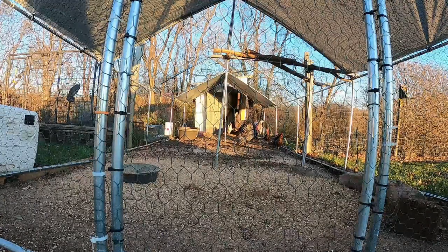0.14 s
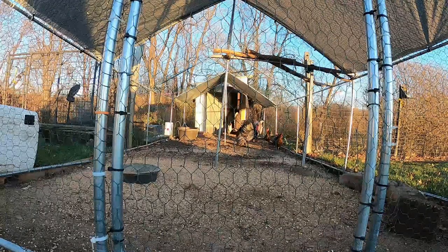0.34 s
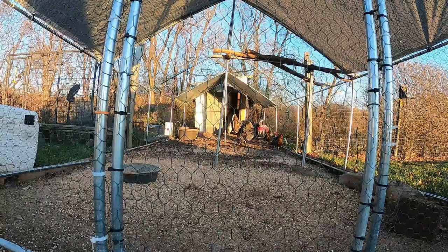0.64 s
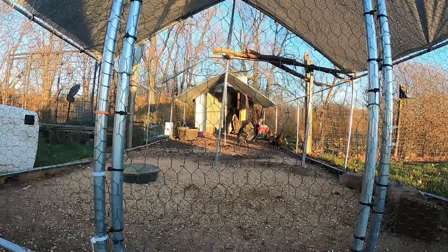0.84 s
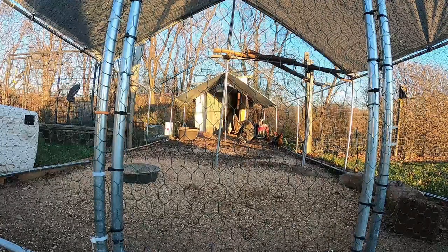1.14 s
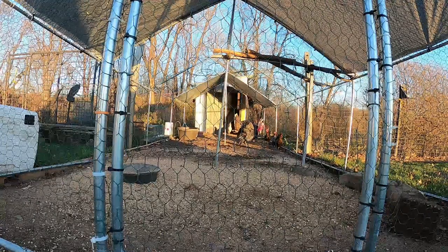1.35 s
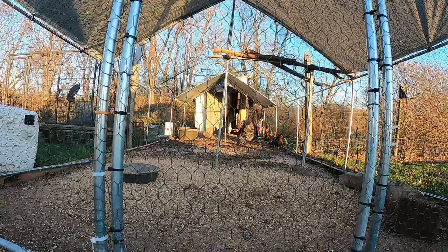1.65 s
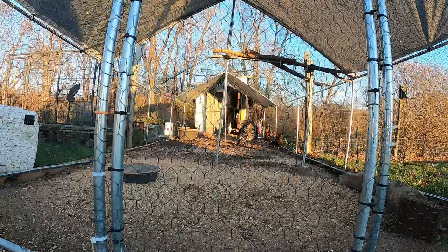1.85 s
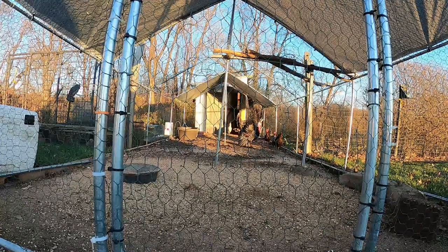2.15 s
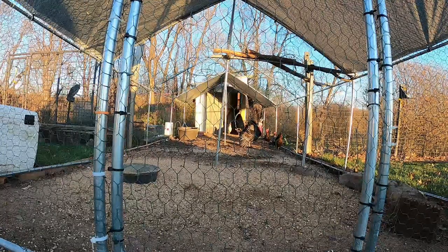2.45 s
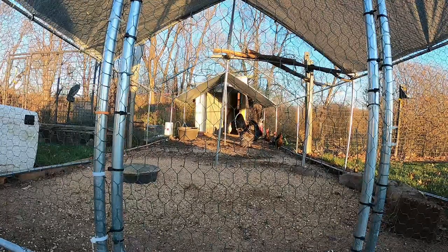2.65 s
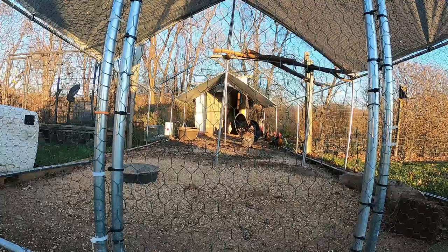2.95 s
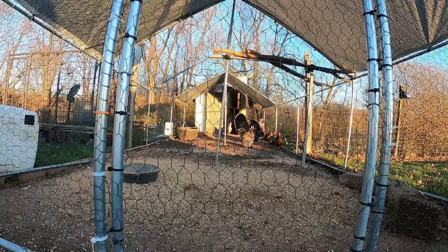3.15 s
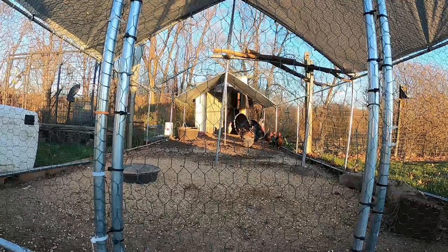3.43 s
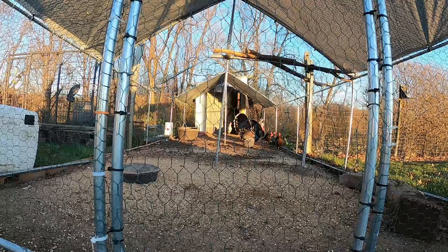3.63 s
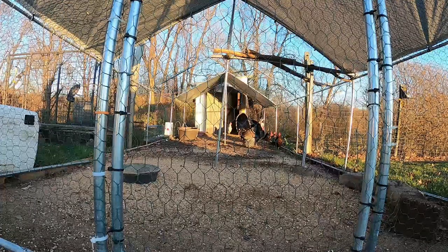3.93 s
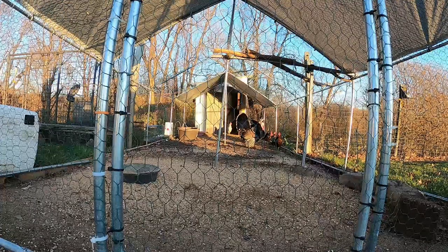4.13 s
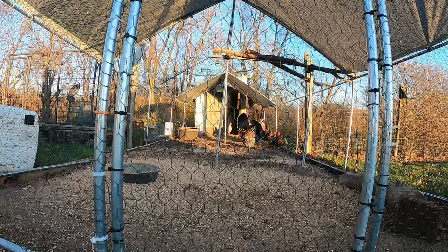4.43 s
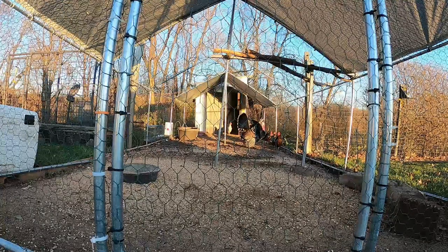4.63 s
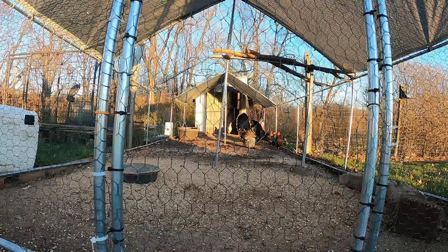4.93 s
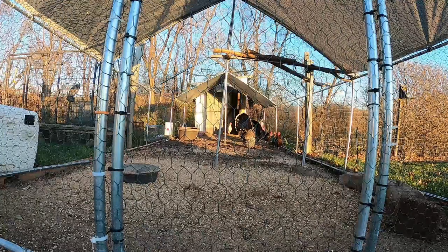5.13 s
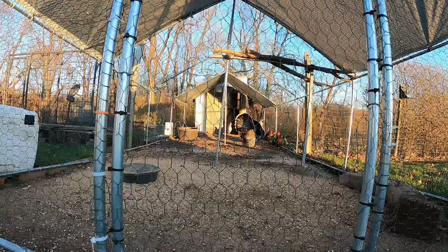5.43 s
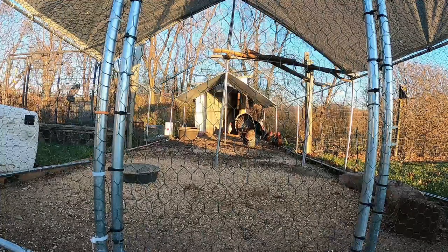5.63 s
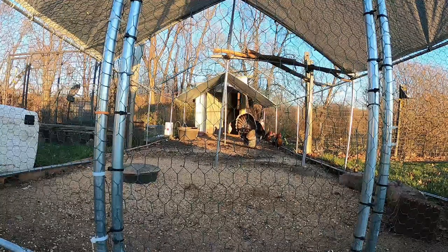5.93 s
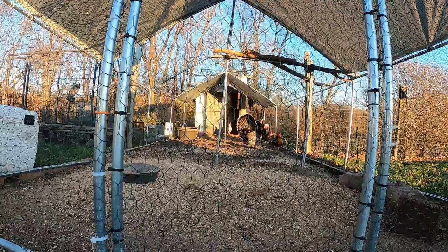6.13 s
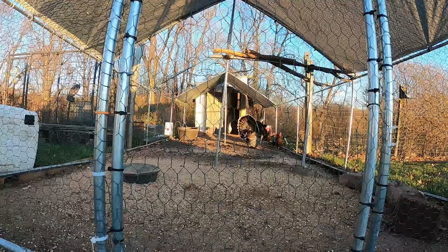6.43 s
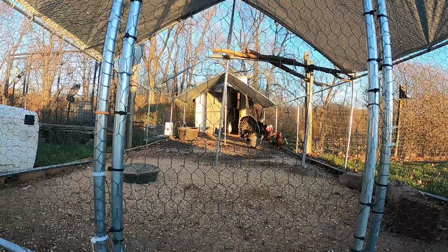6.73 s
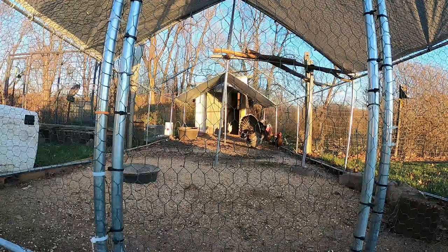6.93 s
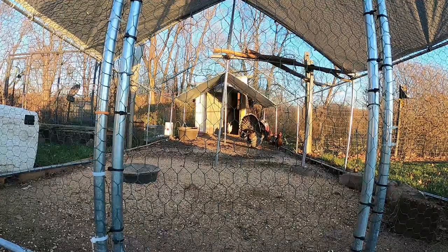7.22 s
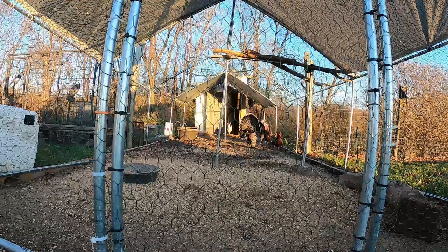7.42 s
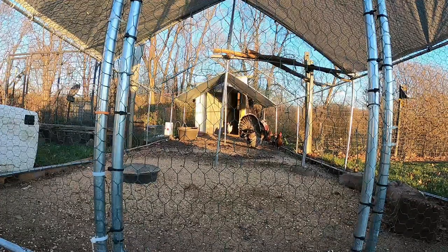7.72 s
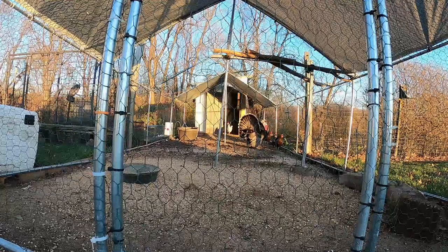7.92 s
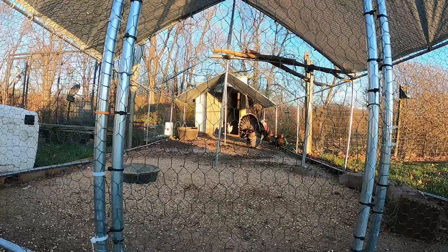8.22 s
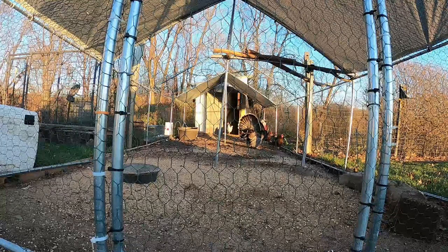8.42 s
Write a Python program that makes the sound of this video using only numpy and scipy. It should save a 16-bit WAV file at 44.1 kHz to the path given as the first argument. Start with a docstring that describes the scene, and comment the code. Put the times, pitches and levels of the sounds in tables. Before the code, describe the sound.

A tom turkey close by gobbles loudly twice in an outdoor run while distant turkeys answer with blurred gobbles and yelps over quiet low rumble.

```python
"""Outdoor turkey run: a tom close by gobbles twice, and others gobble and yelp by the far shed.
Near gobbles open with shrieks, then follow one pattern of hoots near 600 Hz and yodels breaking down
from a squeal. Each voice is a buzzing, fluttering membrane coloured by throat resonance and rasp.
Whistled peeps, a chip and a soft noise rustle sound over a rumble, drone and hum of filtered noise."""
import sys
import numpy as np
from scipy import signal
from scipy.fft import rfft, irfft, next_fast_len
from scipy.io import wavfile
from scipy.ndimage import uniform_filter1d, minimum_filter1d, map_coordinates

SR = 44100
rng = np.random.default_rng(int(sys.argv[2]) if len(sys.argv) > 2 else 0)


def file_out(sig):
    """Save sig as 16-bit WAV at sys.argv[1]."""
    # one column per channel
    cols = np.atleast_2d(sig).T
    # limit, then scale
    lim = np.clip(cols, -1, 1)
    pcm = np.round(lim * 32767).astype(np.int16)
    wavfile.write(sys.argv[1], SR, pcm)


N = 377937
CUTOFF_HZ = 14200  # upper band limit of voices and output


def amp(db):
    """Converts dB to an amplitude factor."""
    return 10 ** (np.asarray(db) / 20)


def evened(x):
    """Scales to rms 1."""
    return x / np.sqrt(np.mean(x ** 2) + 1e-20)


def read(points, hz):
    """Interpolates (Hz, value) points on a log-frequency axis."""
    point_hz, value = np.transpose(points)
    return np.interp(np.log(hz + 1), np.log(point_hz), value)


def level_curve(points):
    """Interpolates (s, dB) points over the scene, as an amplitude factor."""
    t = np.arange(N) / SR
    return amp(np.interp(t, *np.transpose(points)))


def add(mix, start_s, sound):
    """Mixes a sound in at start_s, trimming whatever falls outside the mix."""
    start = round(start_s * SR)
    sound = sound[max(-start, 0):]
    part = mix[max(start, 0):][:len(sound)]
    part += sound[:len(part)]


def colour(x, points, peak_hz=0, width_hz=0):
    """Filters by a (Hz, dB) spectrum and, if given, one resonance; rms 1."""
    size = next_fast_len(2 * len(x))
    hz = np.fft.rfftfreq(size, 1 / SR)
    gain = amp(read(points, hz))
    if width_hz:
        gain = gain / (1 + 2j * (hz - peak_hz) / width_hz)
    filtered = irfft(rfft(x, size) * gain, size)
    return evened(filtered[:len(x)])


def wander(count, rate_hz):
    """Smooth random motion of rms about 1."""
    at = np.arange(count) * abs(rate_hz) / SR
    return map_coordinates(rng.standard_normal(size=1024), [at], order=3, mode="wrap")


def swell(u, edge):
    """Rises and falls over the share edge of a note; u runs from 0 to 1."""
    return np.sin(np.pi / 2 * np.clip(np.minimum(u, 1 - u) / edge, 0, 1))


def reverb(x, decay, delay_s):
    """Sparse reflections of random sign, each band dying at its own speed; energy 1."""
    taps = rng.choice([-1., 1.], SR) * (rng.random(SR) < 1 / 20)
    hz, t, spectrum = signal.stft(taps, SR)
    t60_s = read(decay, hz)[:, None]
    tail = signal.istft(spectrum * np.exp(-np.log(1000) * t / t60_s), SR)[1]
    tail = np.r_[np.zeros(round(abs(delay_s) * SR)), tail]
    return signal.oaconvolve(x, tail / np.linalg.norm(tail))[:N]


# outdoor rumble spectrum: (freq_hz, density_db_per_hz), relative
AIR = [(15, -51.5), (25, -25.5), (129, -4.5), (372, -14.5), (569, -15), (940, -16.5), (1130, -16.5),
       (2640, -28), (4140, -35), (7420, -46.5), (8240, -53.5), (14000, -55.5)]
# gain of the whole background: (time_s, gain_db)
AIR_LEVEL = [(0, -46), (.44, -47.5), (.55, -48), (1.4, -53), (2.0, -50.5), (3.7, -48.5), (4.6, -49.5),
             (6.05, -48.5), (6.2, -47), (7.3, -52), (8.57, -50)]
# gain of the drone within the background: (time_s, gain_db)
DRONE_LEVEL = [(0, -16), (1.5, -10.5), (2.2, 0), (3.0, -3), (4.4, -8.5), (5.5, -5.5), (7.0, -10.5),
               (8.57, -10)]
HUM_HZ, HUM_DB = 591, -11.5  # HUM_DB within the background


def outdoors():
    """Broad noise with a drifting level, plus two noise resonances: a hoarse drone and a faint hum."""
    air = colour(rng.standard_normal(N), AIR) * amp(.9 * wander(N, rate_hz=7))
    drone_shape = [(60, -25.0), (125, -6.5), (300, -7.5)]
    drone = colour(rng.standard_normal(N), drone_shape, peak_hz=122.4, width_hz=15)
    hum_shape = [(350, -14.5), (585, -1), (900, -17.5)]
    hum = colour(rng.standard_normal(N), hum_shape, HUM_HZ, width_hz=26)
    background = amp(-0.9) * air + level_curve(DRONE_LEVEL) * drone + amp(HUM_DB) * hum
    return level_curve(AIR_LEVEL) * background


BREATH_FLOOR = 0.06  # share of air noise even in a clean note


def syrinx(pitch_hz, rough, jitter, breath, even_db=0):
    """Vibrating membrane: phase, harmonic buzz with an air puff each cycle, and uneven flutter."""
    rough = np.clip(rough, 0, 1)
    pitch_hz = pitch_hz * (1 + jitter * rough * wander(len(pitch_hz), rate_hz=508.3))
    phase = 2 * np.pi * (np.cumsum(pitch_hz) / SR + rng.random())
    k = np.arange(2, CUTOFF_HZ // pitch_hz.mean() + 1)[:, None]
    # each note has its own harmonic mix
    lag, size = rng.standard_normal((2, 64, 1))[:, :len(k)]
    harmonic_gain = amp(8.0 * size + even_db * (k % 2 == 0))
    pulses = evened((harmonic_gain * np.cos(k * phase + lag)).sum(0))
    puffs = evened((1 + np.cos(phase)) * rng.standard_normal(size=8192)[:len(pitch_hz)])
    share = np.clip(BREATH_FLOOR + breath * rough ** 2, 0, .5)
    # a slack membrane beats unevenly
    flutter = amp(4.5 * rough * wander(len(pitch_hz), rate_hz=300))
    return phase, flutter * ((1 - share) * pulses + share * puffs), flutter


def far_voice(u, pitch_hz, spread):
    """One hoarse bird of the flock, a little off the common pitch, on an arch of its own."""
    offset, slope = rng.standard_normal(2)
    arch = 0.0885 * slope * (u - .5) - 0.292 * (u - .5) ** 2
    pitch_hz = pitch_hz * (1 + spread * offset + arch)
    return syrinx(pitch_hz, rough=.55, jitter=.04, breath=.7)


# far throat band, relative: (freq_hz, gain_db)
FAR_THROAT = [(1300, -10), (1900, 13), (2900, 6), (4400, -1.5), (5400, -51)]
# far rasp spectrum, relative: (freq_hz, gain_db)
FAR_RASP = [(3400, -18), (4500, -7), (5300, -14.5), (5900, -2.5), (6650, -5), (7100, -14.5), (7560, -34.5),
            (8400, -34), (9000, -42), (13000, -61)]
FAR_THROAT_WIDTH_HZ = 910
FAR_SYLLABLE_S = 0.044  # length at 600 Hz


def far_syllable(peak_s, pitch_hz, throat_hz, tone_db, throat_db, rasp_db):
    """Three birds overlap: a hoot whose fundamental the ground reflection cancels, a squeal, a thin rasp."""
    # high notes are drawn out, low ones clipped
    length_s = min(FAR_SYLLABLE_S * (pitch_hz / 600) ** 3, .1)
    u = np.linspace(0, 1, round(length_s * SR))
    phase, _, flutter = far_voice(u, pitch_hz, spread=.012)
    tone = amp(tone_db) * evened(flutter * (np.sin(2 * phase) + 0.18 * np.sin(phase)))
    _, squeal, _ = far_voice(u, 2 * pitch_hz, spread=0.095)
    _, buzz, _ = far_voice(u, pitch_hz, spread=0.055)
    throat = amp(throat_db) * colour(squeal + 3.0 * buzz, FAR_THROAT, throat_hz, FAR_THROAT_WIDTH_HZ)
    rasp = amp(rasp_db) * colour(buzz, FAR_RASP)
    window = np.sin(np.pi * u).clip(0)
    return peak_s - length_s / 2, window ** 1.13 * (tone + throat) + window ** 3.2 * rasp


FAR_OPEN_HZ, FAR_RATTLE_HZ, FAR_SAG_AT_S, FAR_SAG_S = 678, 548.3, 0.32, 0.06


def far_pitch(s):
    """Nominal pitch in Hz, sagging from the drawn-out opening notes to the rattle."""
    return FAR_RATTLE_HZ + (FAR_OPEN_HZ - FAR_RATTLE_HZ) / (1 + np.exp((s - FAR_SAG_AT_S) / FAR_SAG_S))


# far gobbles; dB columns offset the syllable levels:
# (start_s, throat_hz, second_harmonic_db, throat_db, rasp_db, fade_db_per_s)
FAR_GOBBLES = [(-0.593, 3100, -7.5, -0.5, 2, -10.5), (1.492, 3300, -8, -9.5, 2, -2),
               (3.595, 2980, -2.5, -1, -1.5, -2.5), (5.234, 2520, -1, 1.5, -0.5, 0),
               (7.0, 2100, -11, -4.5, -5.5, 3.5)]
# rattle shared by them: (peak_after_start_s, second_harmonic_db, throat_db, rasp_db), before offsets
FAR_SYLLABLES = [(0.05, -46, -56.5, -60), (0.096, -50, -51, -45), (0.145, -35.5, -46, -45),
                 (0.17, -61, -66, -40), (0.208, -45.5, -48.5, -74), (0.267, -39, -42, -53.5),
                 (0.317, -35, -44, -40.5), (0.357, -36.5, -38.5, -44.5), (0.392, -43, -40, -34),
                 (0.43, -43, -38.5, -44), (0.468, -30, -39, -57), (0.51, -36, -38.5, -47),
                 (0.608, -33.5, -40, -43.5), (0.677, -31.5, -42, -58), (0.717, -41.5, -42.5, -56),
                 (0.787, -47.5, -52.5, -68.5), (0.895, -39.5, -44.5, -56.5)]
# single yelps, levels before the mix:
# (peak_s, pitch_hz, throat_hz, second_harmonic_db, throat_db, rasp_db)
FAR_YELPS = [(0.022, 682, 3220, -45.5, -42.5, -40), (1.549, 678, 2030, -56, -43, -73),
             (1.662, 686, 2000, -46, -55, -38.5), (2.278, 725, 3080, -51, -44.5, -57),
             (2.331, 670.5, 3380, -45.5, -41.5, -46.5), (2.441, 641, 3240, -53, -46, -62),
             (3.645, 680, 1750, -42, -47, -77), (5.355, 595, 2758, -56, -36, -62),
             (7.074, 617, 2160, -58, -38.5, -61), (7.132, 702, 2070, -44.5, -33.5, -48),
             (7.285, 651, 1950, -48, -32.5, -47), (7.509, 531, 3180, -40, -39, -55),
             (7.606, 646, 3150, -49, -39.5, -50), (7.894, 649, 2200, -50, -42, -55.5)]
# reverberation of the yard: (freq_hz, t60_s)
YARD_DECAY = [(1200, 0.6), (3000, 0.54), (7000, 0.24), (12000, 0.54)]
FAR_SCATTER = 0.04  # rms pitch miss of a syllable, as a share


def far_turkeys(echo_db=-4, follow_db=-11):
    """Gobbles by the shed: other birds join in out of step, and fence and trees blur them all."""
    voice = np.zeros(N)
    for start_s, throat_hz, *gobble_db, fade_db_per_s in FAR_GOBBLES:
        for s, *syllable_db in FAR_SYLLABLES:
            pitch_hz = far_pitch(s) * (1 + FAR_SCATTER * rng.standard_normal())
            levels_db = np.add(gobble_db, syllable_db) + fade_db_per_s * s
            add(voice, *far_syllable(start_s + s, pitch_hz, throat_hz, *levels_db))
            lag, detune = rng.uniform(-1.2, 1, 2)
            follow_hz = pitch_hz * (1.04 + .14 * detune)
            at_s, follower = far_syllable(start_s + s + .04 * lag, follow_hz, throat_hz, *levels_db)
            add(voice, at_s, amp(follow_db) * follower)
    for row in FAR_YELPS:
        add(voice, *far_syllable(*row))
    return amp(-1.5) * voice + amp(echo_db) * reverb(voice, YARD_DECAY, delay_s=0.014)


# near rasp spectrum, relative, before the tilt: (freq_hz, gain_db)
NEAR_RASP = [(2100, -35.5), (2700, -9.5), (3100, 6.5), (3400, -4.5), (3800, -5.5), (4200, -8.5),
             (5000, -12.5), (6450, -25), (7500, -39.5), (9600, -35), (14000, -59.5)]


def near_rasp(buzz, db):
    """The rasp at the beak: below -26 dB, the softer it is, the less top it has."""
    hz, shape_db = np.transpose(NEAR_RASP)
    tilt_db_per_octave = 0.077 * (min(db, -26) + 32.0)
    tilt_db = tilt_db_per_octave * np.log2(np.maximum(hz / 5000, 1))
    return amp(db) * colour(buzz, np.c_[hz, shape_db + tilt_db])


# near throat band, relative: (freq_hz, gain_db)
NEAR_THROAT = [(600, -38), (950, 3), (1300, 8.5), (2300, 3.5), (3000, -9), (4500, -63)]
SHRIEK_SCOOP, HOOT_SCOOP = 0.1676, 0.07  # share of its pitch by which a note starts flat


def near_syllable(s, length_s, pitch_hz, end_hz, rough, hoot_db, throat_hz, throat_db, rasp_db,
                  even_db=0, scoop=HOOT_SCOOP):
    """A round hoot on a bending pitch; at its height the overtones ring the throat and rasp at the beak."""
    u = np.linspace(0, 1, round(length_s * SR))
    bend_hz = (end_hz - pitch_hz) * (2 * u - 1) * u
    glide_hz = pitch_hz * (1 - scoop * (1 - u) ** 4) + bend_hz
    phase, buzz, flutter = syrinx(glide_hz, rough, jitter=0.086, breath=0.21, even_db=even_db)
    hoot = amp(hoot_db) * evened(np.sin(phase) * flutter)
    throat = amp(throat_db) * colour(buzz, NEAR_THROAT, throat_hz, width_hz=240)
    rasp = near_rasp(buzz, rasp_db)
    return s, swell(u, edge=0.2) * hoot + swell(u, edge=0.54) * (throat + rasp)


# the throat rings near the second harmonic in a shriek and near the third in a hoot
SHRIEK_THROAT_RATIO, HOOT_THROAT_RATIO = 2.17, 3.38
SHRIEK_FUNDAMENTAL_DB = -28


def shriek(s, length_s, pitch_hz, end_hz, rough, throat_db, rasp_db):
    """A harsh opening note that scoops up: a weak fundamental under a ringing octave."""
    return near_syllable(s, length_s, pitch_hz, end_hz, rough, SHRIEK_FUNDAMENTAL_DB,
                         SHRIEK_THROAT_RATIO * pitch_hz, throat_db, rasp_db, scoop=SHRIEK_SCOOP)


YODEL_SCATTER = 0.025  # rms pitch miss of a yodel, as a share


def yodel(s, length_s, squeal_hz, squeal_db, yelp_db, hoot_db):
    """The voice jumps down through three registers: a squeal heard by its octave, a yelp, a hoot."""
    u = np.linspace(0, 1, round(length_s * SR))
    squealing, hooting = u < .44, u > .68
    register_hz = np.where(squealing, squeal_hz, np.where(hooting, 570, 1020))
    pitch_hz = register_hz * (1.025 - 0.0796 * u) * (1 + YODEL_SCATTER * rng.standard_normal())
    phase, buzz, _ = syrinx(pitch_hz, rough=0.64, jitter=0.045, breath=1.0)
    high = uniform_filter1d(1.0 * squealing, size=48)  # the break takes about a millisecond
    squeal = amp(squeal_db) * np.exp(-((u - .3) / 0.14) ** 2) * high
    squeal *= np.sin(2 * phase) + 0.19 * np.sin(phase)
    yelp = amp(yelp_db) * np.exp(-((u - .56) / 0.13) ** 2) * (1 - high)
    hoot = amp(hoot_db) * np.exp(-((u - .8) / 0.092) ** 2)
    # rasp around the register breaks
    crack_db = yelp_db - 7.5
    crack = near_rasp(buzz, crack_db) + amp(crack_db) * colour(buzz, NEAR_THROAT)
    crack *= np.exp(-((u - .58) / 0.21) ** 2)
    return s, swell(u, edge=0.08) * (2 * (squeal + (yelp + hoot) * np.sin(phase)) + crack)


# hoots of every gobble, before its pitch ratio and level:
# (after_start_s, length_s, pitch_hz, end_pitch_hz, roughness_0_1, hoot_db, overtones_db)
HOOTS = [(0.085, 0.073, 700, 701, 0.1, -20, -30), (0.138, 0.038, 637, 494, 0.05, -15, -34.5),
         (0.178, 0.034, 625, 663, 0.56, -27, -28.5), (0.201, 0.02, 582, 590, 0.35, -17.5, -31.5),
         (0.241, 0.014, 711, 685, 0.77, -37, -23.5), (0.251, 0.025, 612, 545, 0.05, -15, -27.5),
         (0.298, 0.043, 610, 635, 0.12, -15, -25.5), (0.334, 0.035, 660.2, 530, 0.12, -17, -25),
         (0.542, 0.042, 580, 493, 0.2, -16.5, -28.5), (0.749, 0.039, 567.7, 491, 0, -16, -27)]
# yodels between them, before the same: (after_start_s, squeal_hz, squeal_db, yelp_db, hoot_db)
YODELS = [(0.276, 1690, -24.5, -24, -40.5), (0.399, 1520, -30, -27, -23.5),
          (0.444, 1550, -29.5, -23.5, -18), (0.602, 1470, -31.5, -28.5, -19.5),
          (0.65, 1540, -30.5, -32, -26), (0.809, 1492, -32, -34.5, -35.5)]
YODEL_S = 0.038
# rasp against the overtones; it softens as the tom runs out of air
HOOT_RASP_DB, RASP_FADE_DB_PER_S = -1, -11
EVEN_FADE_DB_PER_S = -7  # the hoots grow hollow: their even harmonics fade


def near_gobble(pitch_ratio):
    """The hoots and yodels of one gobble, each as (s after its start, sound)."""
    for s, length_s, pitch_hz, end_hz, rough, hoot_db, overtones_db in HOOTS:
        rasp_db = overtones_db + HOOT_RASP_DB + RASP_FADE_DB_PER_S * s
        yield near_syllable(s, length_s, pitch_ratio * pitch_hz, pitch_ratio * end_hz, rough, hoot_db,
                            HOOT_THROAT_RATIO * pitch_hz, overtones_db, rasp_db, EVEN_FADE_DB_PER_S * s)
    for s, squeal_hz, *levels_db in YODELS:
        yield yodel(s, YODEL_S, pitch_ratio * squeal_hz, *levels_db)


# opening shrieks, levels before the mix:
# (start_s, length_s, pitch_hz, end_pitch_hz, roughness_0_1, throat_db, rasp_db)
SHRIEKS = [(0.452, 0.025, 677, 738, 0.7, -17, -28), (0.467, 0.016, 954, 1025, 0.37, -11.5, -22.5),
           (0.473, 0.042, 900, 852, 0.8, -19.5, -27), (0.51, 0.034, 746.5, 800, 0.15, -16, -29),
           (0.535, 0.036, 688.4, 753, 0.15, -15.5, -24.5), (6.081, 0.021, 871, 1101, 0.35, -29.5, -29.5),
           (6.096, 0.038, 984, 925, 0.8, -21.5, -20), (6.132, 0.05, 953, 1007, 0.97, -23.5, -27),
           (6.163, 0.05, 690, 672, 0.3, -21.5, -18)]
# near gobbles: (start_s, gain_db, fade_db_per_s, pitch_ratio)
NEAR_GOBBLES = [(0.451, -1.5, 0.5, 1.0), (6.082, -0.07, -4, 1.01)]
# reverberation of the run: (freq_hz, t60_s)
RUN_DECAY = [(500, 0.19), (1500, 0.32), (3200, 0.14), (9000, 0.2)]
# colour of one distinct reflection in the run, relative: (freq_hz, gain_db)
SLAP = [(400, -18), (700, -12), (1000, -4.5), (1400, -11), (1800, 4), (2400, -19.5), (3200, -6),
        (6000, -2.5)]
SLAP_S, SLAP_DB = 0.023, -14  # delay; level re voice rms


def near_tom():
    """Two gobbles under the canopy, each syllable with a faint low thud."""
    voice = np.zeros(N)
    for row in SHRIEKS:
        add(voice, *shriek(*row))
    for start_s, gain_db, fade_db_per_s, pitch_ratio in NEAR_GOBBLES:
        for s, sound in near_gobble(pitch_ratio):
            add(voice, start_s + s, amp(gain_db + fade_db_per_s * s) * sound)
    effort = np.sqrt(abs(uniform_filter1d(voice ** 2, size=600)))
    thud_shape = [(30, -47.5), (75, 9.0), (140, -10.0), (450, -2), (1200, -47.5)]
    thud = colour(rng.standard_normal(N), thud_shape)
    # the overtones are beamed away from the listener, so more of them arrive as echoes
    lowpass = signal.butter(2, 850, fs=SR, output="sos")
    beamed = voice - 0.56 * signal.sosfiltfilt(lowpass, voice)
    echoes = amp(-4.0) * reverb(beamed, RUN_DECAY, delay_s=.003)
    echoes += amp(-41.5) * reverb(voice, YARD_DECAY, delay_s=0.0063)
    add(echoes, SLAP_S, amp(SLAP_DB) * voice.std() * colour(voice, SLAP))
    return amp(1.5) * voice + echoes + amp(-36) * effort ** 0.36 * thud


# peeps, levels before the mix: (start_s, level_db)
PEEPS = [(2.724, -68), (2.999, -63), (4.448, -71), (5.991, -68), (8.383, -60.5)]
CHIP_S, CHIP_HZ, CHIP_DB = 2.197, 4106, -49  # one lower call, level before the mix


def small_bird(length_s=0.031, top_hz=7750):
    """Thin sine whistles that sweep up and round over, and one steady chip, with a tail from the trees."""
    song = np.zeros(N)
    u = np.linspace(0, 1, round(length_s * SR))
    for start_s, level_db in PEEPS:
        pitch_hz = top_hz * (1 + 0.033 * rng.standard_normal() - 1.0 * (u - .72) ** 2)
        whistle = np.sin(2 * np.pi * np.cumsum(pitch_hz) / SR)
        add(song, start_s, amp(level_db) * evened(swell(u, edge=0.13) * whistle))
    chip = np.sin(2 * np.pi * CHIP_HZ * length_s * u)
    add(song, CHIP_S, amp(CHIP_DB) * evened(swell(u, edge=0.69) * chip))
    return amp(3.5) * song + amp(0.5) * reverb(song, YARD_DECAY, delay_s=0.017)


# rustle spectrum, relative: (freq_hz, gain_db)
RUSTLE = [(100, -9), (300, 1), (600, 2), (1400, -20), (4000, -24), (9000, -43)]
RUSTLE_S, RUSTLE_LENGTH_S, RUSTLE_DB = 8.32, 0.17, -49.5


def rustle():
    """A short, dull scuffle: low noise of uneven level."""
    out = np.zeros(N)
    u = np.linspace(0, 1, round(RUSTLE_LENGTH_S * SR))
    grain = colour(rng.standard_normal(len(u)), RUSTLE) * amp(4.1 * wander(len(u), rate_hz=59))
    add(out, RUSTLE_S, amp(RUSTLE_DB) * swell(u, edge=0.58) * grain)
    return out


def scene():
    """Sums all sources into one channel."""
    return (outdoors() + far_turkeys() + near_tom() + small_bird() + rustle())[None]


def record(dry, ceiling=0.79):
    """A fast limiter holds down the loudest syllables; then the band limit."""
    gain = minimum_filter1d(np.minimum(1, ceiling / (abs(dry) + 1e-9)), size=256)
    limited = dry * uniform_filter1d(gain, size=256)
    lowpass = signal.firwin(511, CUTOFF_HZ, window=("kaiser", 9), fs=SR)
    return signal.oaconvolve(limited, lowpass[None], "same")


dry = scene()
out = record(dry)
file_out(out)
```